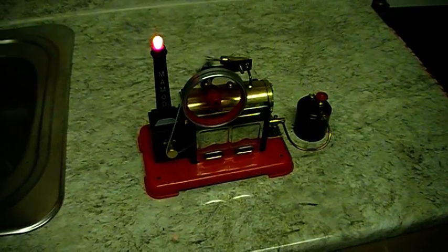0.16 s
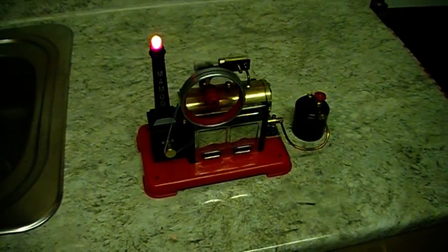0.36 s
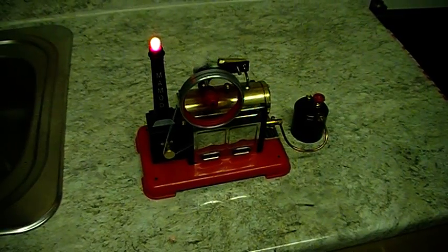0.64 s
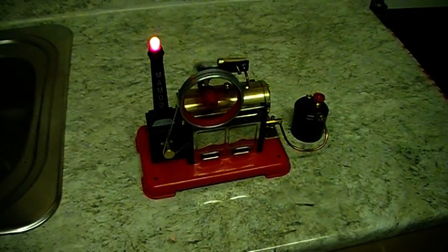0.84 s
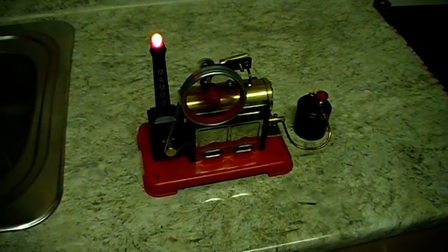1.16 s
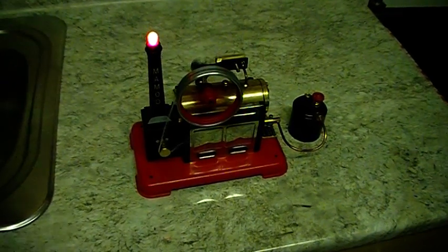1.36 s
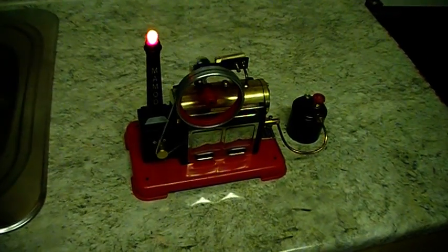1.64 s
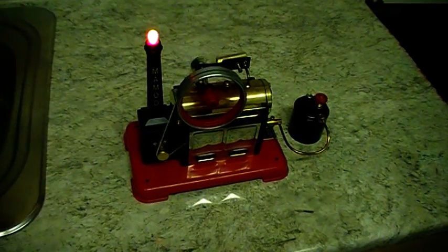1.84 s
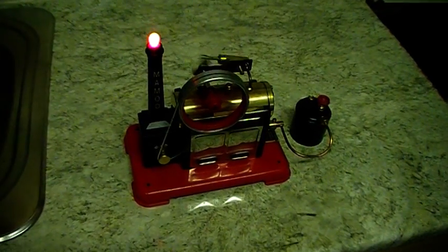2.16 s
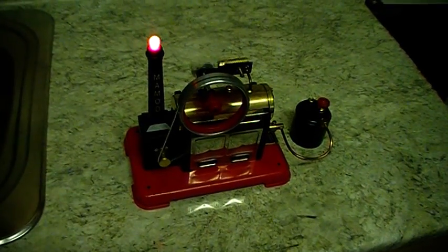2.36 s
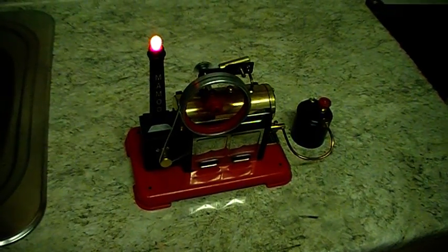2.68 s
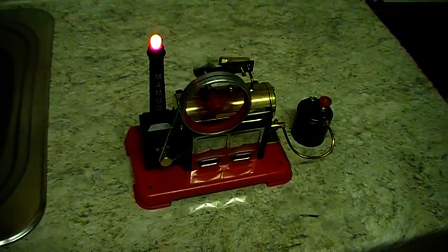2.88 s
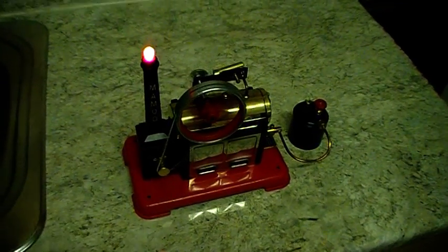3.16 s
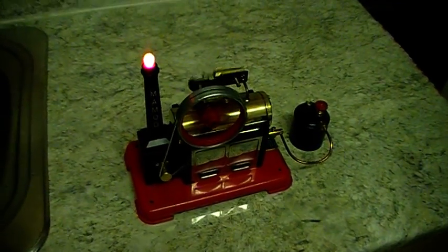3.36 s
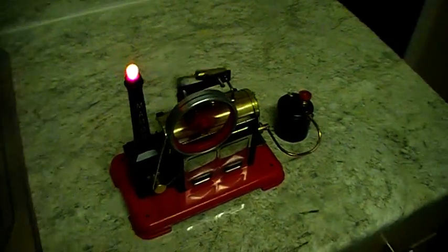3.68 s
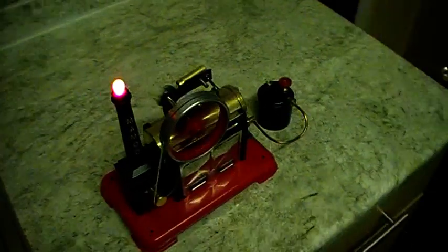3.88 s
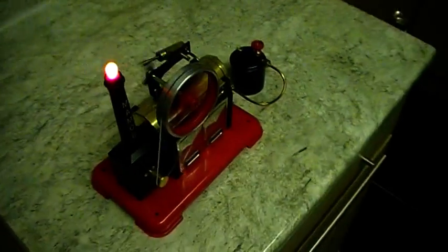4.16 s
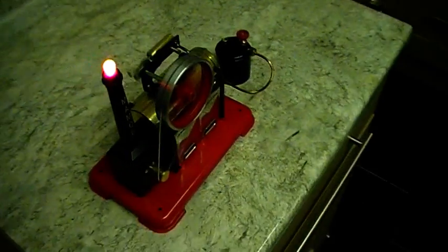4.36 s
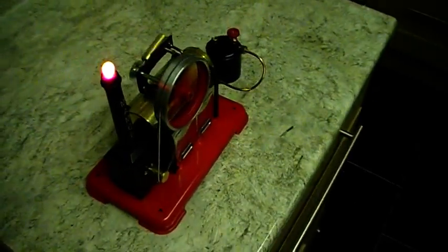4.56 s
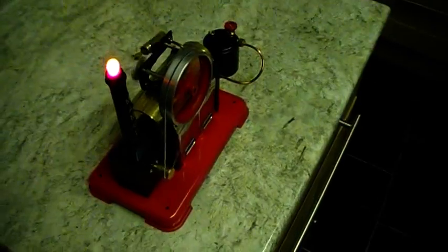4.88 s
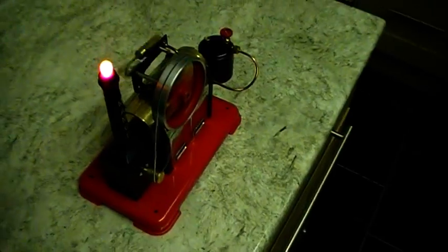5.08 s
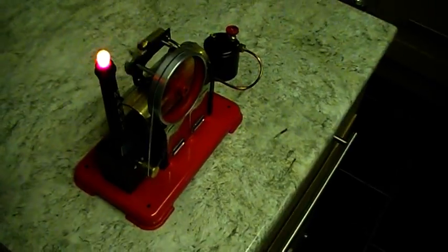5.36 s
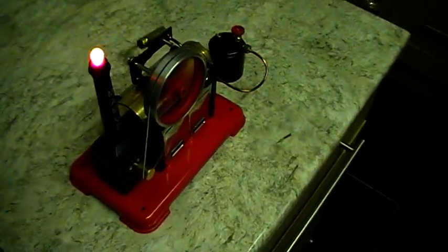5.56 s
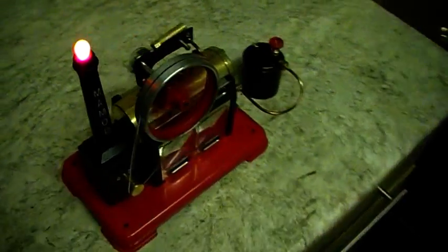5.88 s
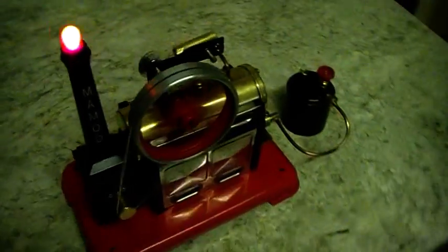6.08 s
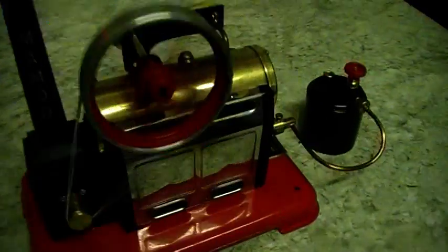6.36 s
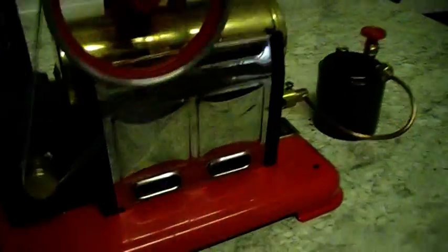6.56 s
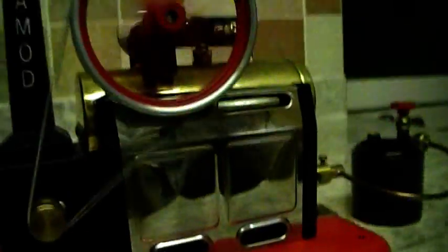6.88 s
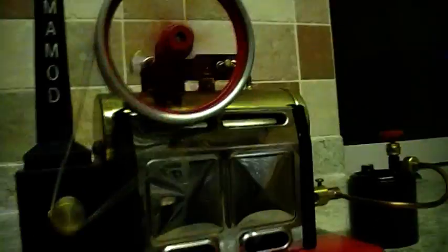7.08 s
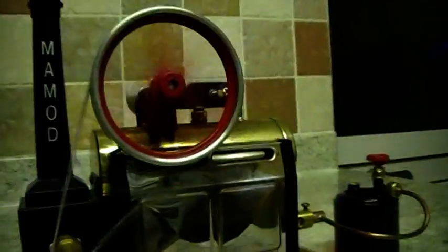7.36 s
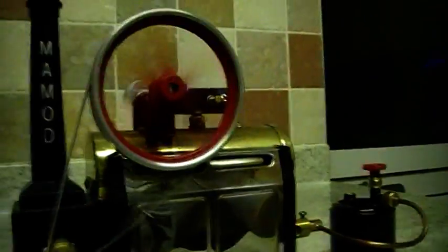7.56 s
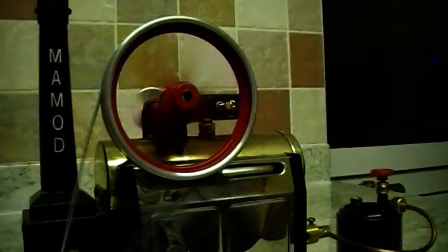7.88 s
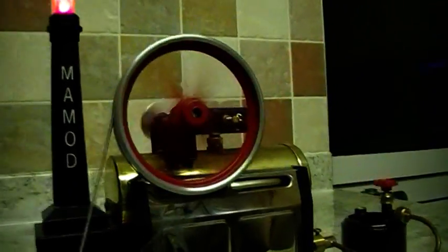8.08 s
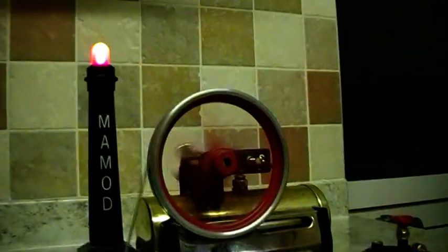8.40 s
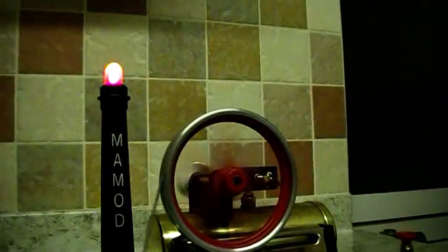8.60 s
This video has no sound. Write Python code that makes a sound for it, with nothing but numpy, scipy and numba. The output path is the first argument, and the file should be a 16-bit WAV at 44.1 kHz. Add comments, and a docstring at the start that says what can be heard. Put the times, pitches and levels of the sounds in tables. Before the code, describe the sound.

Fast, steady metallic clatter of a running miniature steam engine, with a buzzing dynamo and faint steam hiss, heard up close.

```python
"""Toy steam engine with dynamo.

The engine runs on a stone kitchen counter. Each crank turn gives a chuff and a string of knocks that
ring the tin base; a belt-driven dynamo chatters about five times as fast. The linkage rattles once per
belt lap and now and then clinks. Steam hisses throughout. The microphone moves from the front to the
side, then close to the flywheel."""
import sys
import numpy as np
from scipy import signal
from scipy.fft import rfft, irfft
from scipy.io import wavfile
from numba import njit

SR = 44100
rng = np.random.default_rng(int(sys.argv[2]) if len(sys.argv) > 2 else 0)


def wav_out(sig):
    """Save sig, one row per channel (or a flat mono array), as 16-bit PCM at SR to the path in sys.argv[1]."""
    wavfile.write(sys.argv[1], SR, np.round(np.clip(np.atleast_2d(sig).T, -1, 1) * 32767).astype(np.int16))


N = 384993
TIME_S = np.arange(N) / SR

CRANK_HZ, CRANK_START_S = 16.517, .0524
DYNAMO_HZ, DYNAMO_START_S = 85.008, .0009
BELT_HZ, BELT_START_S = 2.43, -.03
# (front, side, close)
CLATTER_DB, THUMP_DB = (-25.5, -21.5, -27), (-38.5, -35.5, -38)
CHUFF_DB, HOUSING_DB, LINK_DB = (-38, -36.5, -37), (-23.5, -31, -27), (-29, -31, -31)

# Crank and piston play, port leaks: (delay in turn [s], level [dB])
TURN_KNOCKS = [(.0026, -5), (.007, -3), (0.013, -3.5), (.02, -11.5), (.032, -3.5), (0.038, -4.5),
               (0.0478, -6)]
TURN_LEAKS = [(-.001, -11), (0.016, -1.5), (0.027, -3), (.039, -5.5)]
# Resonances: (centre [Hz], width [Hz], front [dB], side [dB], close [dB])
BODY_MODES = [(486.4, 43, 2, -12, -8), (513, 12, -4, -3, -9), (610.6, 16, -15.5, 0, -19),
              (904, 41, -1.5, -1.5, 9), (1103, 12, 12, 9.5, 16), (1143, 20, 15.5, -5, 17),
              (1243, 22, -5, 2.5, 13.5), (1385, 45, 5, 4, 3), (1454, 20, 11.5, 8.5, 11),
              (1502, 24, 9.5, 10, 9), (1695, 30, 5, 3, 9), (2280, 96, -4, -30, -14),
              (2490, 52, -14.5, -9, -25)]  # base, firebox, boiler
DYNAMO_HOUSING_MODES = [(888, 216, -7, 2, -2), (1171, 200, -10, -4, 0.5), (2060, 180, -6.5, -14, 6),
                        (3140, 90, -14, -24, -4.5), (3765, 58, -10.5, -17, -10)]
DYNAMO_PULLEY_MODES = [(5806, 195, -5, 0, -6.5), (6043, 410, 1, 2, 2.5)]
DYNAMO_SPINDLE_MODES = [(7810, 260, -7, 0, -0.5), (8230, 390, 2, 4.5, -4), (8740, 300, -9, -16, -3.5),
                        (9500, 320, -4.5, -14, -7.5), (10010, 230, -9, -1, -15),
                        (11930, 340, -12, -10, -17), (13200, 420, -16.5, -20, -28)]
# Linkage resonances: (centre [Hz], width [Hz], level [dB])
LINKAGE_MODES = [(1690, 98, 3.5), (2060, 60, 1.5), (2200, 500, -4.5), (2530, 95, -9)]
# Hard linkage strikes: (time [s], level [dB])
LINKAGE_STRIKES = [(0.0228, -10.5), (0.388, -12), (1.0894, -12), (1.4825, -14.5), (1.942, -10.5),
                   (2.3655, -8.5), (2.9048, -10.5), (3.247, -14.5), (3.3533, -11.5), (3.6, -10),
                   (3.9933, -17), (4.1756, -14), (6.5061, -10), (8.0945, -12)]
# Spectra: (frequency [Hz], level [dB])
PLATE_SPECTRUM = [(60, -57), (110, -18.5), (140, -6), (200, -24), (260, -17), (340, -12), (450, -14.5),
                  (680, -7), (830, 1), (980, 2), (1050, -11), (1140, -3), (1700, 0), (2400, 3.5),
                  (2900, -18), (3800, -2), (4400, -23.5), (15000, -37)]
THUMP_SPECTRUM = [(60, -38), (100, -5), (135, -26), (220, -9.5), (330, -15), (470, 9.5), (600, 10),
                  (900, -19.5), (2500, 2), (4000, -50.5)]
CHUFF_SPECTRUM = [(300, -30), (2000, 10), (3900, -9.5), (4700, 1.5), (5300, 4), (6200, -3), (7100, 1),
                  (9500, -1.5), (11500, -11.5), (15500, -44)]
PORT_SPECTRUM = [(1000, -37), (4500, -1), (7000, 4.5), (10000, 3.5), (13000, -4.5), (15500, -19)]
HISS_SPECTRUM = [(30, -51), (55, -43), (100, -15.5), (130, -12.5), (200, -13.5), (400, -4.5), (700, 5),
                 (1000, 11.5), (2400, 1.5), (3700, -1.5), (4300, -8), (5500, -4), (10000, -5.5),
                 (15500, -19.5)]
STEREO_ECHO_SPECTRUM = [(60, -15.5), (400, -16), (1300, -13.5), (4400, -11.5), (8000, -15), (10000, -1.5),
                        (15000, -12.5)]
# Running gear tones: (frequency [Hz], front [dB], side [dB], close [dB])
HUM_TONES = [(85, -64.5, -62.5, -63), (168, -62, -59.5, -64.5), (314, -53.5, -59.5, -60.5),
             (510.5, -66, -44.5, -47.5), (605, -48.5, -45.5, -48)]
# Microphone: (time [s], place [0 front, 1 side, 2 close], bounce lag [s], bounce [dB], L minus R [dB])
MIC_PATH = [(0, 0, .00205, -20, -1.2), (3.4, 0, .00205, -20, -.8), (4.3, 1, .002, -20, -.3),
            (5.8, 1, .00205, -17, -.1), (6.3, 1.3, .0024, -8, -.1), (6.8, 2, .0026, -15, 0),
            (8.73, 2, .0026, -20, -.3)]
# Microphone crossing the pulley's beam, passing the housing: (time [s], level [dB])
PULLEY_BEAM = [(0, -30.5), (1, -32.5), (3.2, -27), (3.7, -30), (4.4, -34.5), (5.3, -36), (6.3, -29),
               (6.53, -38), (6.75, -27.5), (7, -39.5), (7.3, -36.5), (7.55, -30.5), (8.3, -32),
               (8.65, -29.5)]
HOUSING_PROXIMITY = [(6, 0), (6.55, -2), (7.35, 2), (7.8, 1), (8.4, -2)]
# Gliding interference bands: (time [s], centre [Hz], gain [dB])
LOW_PEAK_GLIDE = [(5.9, 900, -0.5), (6.25, 830, 2.5), (6.5, 774, 3.5), (6.8, 700, 2)]
MID_PEAK_GLIDE = [(5.1, 1480, 0), (5.7, 1470, 2), (6.1, 1450, 4), (6.35, 1290, 3), (6.55, 1200, 0)]
MID_NOTCH_GLIDE = [(5.3, 2080, 0), (5.9, 2050, 0.5), (6.2, 1850, -4.5), (6.42, 1620, -4), (6.58, 1470, -2)]
TREBLE_NOTCH_GLIDE = [(6.35, 7700, 1), (6.6, 7960, -11), (7.15, 8500, -1), (8.73, 8200, -4)]
TREBLE_PEAK_GLIDE = [(6.2, 8280, -3), (6.48, 9000, 5), (6.72, 9900, 4), (6.9, 10000, 3.5)]


def knocks():
    """Loose bearings knock several times per crank turn."""
    return unit(sum(undb(db) * blows(CRANK_HZ, CRANK_START_S + delay_s, jitter_s=.0005, scatter_db=3.5)
                    for delay_s, db in TURN_KNOCKS))


def effort_db(build_db=2.5, build_s=2.8):
    """Level rises as steam pressure builds, with a slight waver."""
    return -build_db * np.maximum(1 - TIME_S / build_s, 0) + .1 * walk(2.5)


def clatter(hits, place):
    """Knocks, sheet-metal buzz and shaft rub ring the tin base, firebox and boiler."""
    buzz = bursts(hits, rise_s=.0011, decay_s=.0045)
    rub = rng.standard_normal(N)
    force = hits + undb(2) * (buzz + rub)
    modes = ring(force, BODY_MODES, place)
    plate = unit(colour(force + undb(-9.5) * convolve(force, tail(t60_s=.061)), PLATE_SPECTRUM))
    return undb(-.5) * modes + undb(-8.5) * plate


def thump():
    """The power stroke shoves the base against the counter."""
    stroke = blows(CRANK_HZ, CRANK_START_S + .001975, jitter_s=.000099, scatter_db=1.85)
    return unit(colour(stroke + undb(4.5) * convolve(stroke, tail(t60_s=.051)), THUMP_SPECTRUM))


def steam(place):
    """The exhaust chuffs once per turn, the ports spit, the boiler hisses."""
    puffs = blows(CRANK_HZ, CRANK_START_S - .001, jitter_s=.00023, scatter_db=1.24)
    exhaust = unit(colour(bursts(puffs, rise_s=.0026, decay_s=.0058), CHUFF_SPECTRUM))
    spits = sum(undb(db) * blows(CRANK_HZ, CRANK_START_S + delay_s, jitter_s=.0012, scatter_db=1.5)
                for delay_s, db in TURN_LEAKS)
    ports = unit(colour(bursts(spits, rise_s=.00072, decay_s=.0039), PORT_SPECTRUM))
    hiss = unit(colour(rng.standard_normal(N), HISS_SPECTRUM)) * undb(1.04 * walk(12))
    return undb(at_place(CHUFF_DB, place)) * (undb(6) * exhaust + undb(1.5) * ports) + undb(-29) * hiss


def dynamo(place):
    """The spindle knocks and scrapes once per turn, ringing itself, the pulley and the housing."""
    ticks = unit(blows(DYNAMO_HZ, DYNAMO_START_S, jitter_s=.0003, scatter_db=2))
    scrape = bursts(ticks, rise_s=.0011, decay_s=.0014)
    scrape += undb(-22.5) * rng.standard_normal(N)  # steady bearing rub
    chatter = scrape + undb(-17) * ticks
    pulley = undb(curves(PULLEY_BEAM)[0]) * ring(chatter, DYNAMO_PULLEY_MODES, place, order=2)
    spindle = undb(-32) * ring(chatter, DYNAMO_SPINDLE_MODES, place, order=2)
    housing_db = at_place(HOUSING_DB, place) + curves(HOUSING_PROXIMITY)[0]
    return pulley + spindle + undb(housing_db) * ring(ticks + scrape, DYNAMO_HOUSING_MODES, place)


def linkage(hits, place, spell_s=.091):
    """The belt joint shakes the linkage once per lap; it rattles for a few turns."""
    laps = (TIME_S - BELT_START_S) * BELT_HZ
    from_joint_s = (laps - np.round(laps)) / BELT_HZ
    looseness = np.exp(-.5 * (from_joint_s / spell_s) ** 2)
    level_db = at_place(LINK_DB, place) + .42 * walk(BELT_HZ)
    force = hits + undb(14) * bursts(hits, rise_s=.00033, decay_s=.0053)
    return looseness * undb(level_db) * ring(force, LINKAGE_MODES, place)


def clinks():
    """Hard linkage strikes, each a short, damped ring."""
    response = resonate(signal.unit_impulse(1024), hz=2090, width_hz=270)
    time_s, db = np.transpose(LINKAGE_STRIKES)
    strikes = np.bincount(np.round(time_s * SR).astype(int), undb(db - 1), N)
    return convolve(strikes, response / np.abs(response).max())


def sway():
    """The return stroke rocks the engine on its feet."""
    push = blows(CRANK_HZ, CRANK_START_S + .03355, jitter_s=.00037, scatter_db=3.5)
    return undb(-60.5) * unit(resonate(push, hz=138, width_hz=45))


def hum(place):
    """Low, wavering tones of the spinning parts."""
    tones = 0
    for hz, *levels_db in HUM_TONES:
        gain = np.sqrt(2) * undb(at_place(levels_db, place) + walk(2.8))
        tones += gain * np.sin(2 * np.pi * hz * TIME_S + .22 * walk(3.5))
    return tones


def counter_bounce(x, lag_s, cutoff_hz=2500):
    """Dull reflection off the counter; its lag follows the microphone."""
    dull = signal.sosfilt(signal.butter(1, cutoff_hz, fs=SR, output="sos"), x)
    return np.interp(np.arange(N) - lag_s * SR, np.arange(N), dull)


def phasing(x):
    """Gliding peaks and notches: direct and reflected sound interfere as the microphone closes in."""
    for glide, width_hz in [(LOW_PEAK_GLIDE, 170.), (MID_PEAK_GLIDE, 170.), (MID_NOTCH_GLIDE, 630.),
                            (TREBLE_NOTCH_GLIDE, 510.), (TREBLE_PEAK_GLIDE, 800.)]:
        hz, db = curves(glide)
        x = x + (undb(db) - 1) * bandpass(x, hz, width_hz)
    return x


def blows(rate_hz, start_s, jitter_s, scatter_db):
    """One impulse per turn, uneven in time and strength."""
    turns = np.arange(-1, int(N / SR * rate_hz) + 1)
    timing, strength = rng.standard_normal((len(turns), 2)).T
    at = np.round((start_s + turns / rate_hz + jitter_s * timing) * SR).astype(int)
    inside = (at >= 0) & (at < N)
    return np.bincount(at[inside], undb(scatter_db * strength[inside]), N)


def bursts(impulses, rise_s, decay_s):
    """Noise burst after each impulse."""
    t = TIME_S[:4096]
    envelope = (1 - np.exp(-t / rise_s)) * np.exp(-t / decay_s)
    return unit(convolve(impulses, envelope) * rng.standard_normal(N))


def ring(x, modes, place, order=1):
    """Resonances weighted by place; pairs alternate in sign. Order 2: flat-topped mode clusters."""
    total = 0
    for k, (hz, width_hz, *levels_db) in enumerate(modes):
        sos = signal.butter(order, [hz - width_hz / 2, hz + width_hz / 2], "band", fs=SR, output="sos")
        total += (-1) ** (k // 2) * at_place(undb(levels_db), place) * signal.sosfilt(sos, x)
    return unit(total)


def resonate(x, hz, width_hz):
    """Two equal resonators in series."""
    b, a = signal.iirpeak(hz, hz / width_hz, fs=SR)
    return signal.lfilter(b, a, signal.lfilter(b, a, x))


@njit
def bandpass(x, hz, width_hz):
    """State-variable band-pass, unity gain at its moving centre."""
    y, band_state, low_state = np.empty(len(x)), 0., 0.
    for i in range(len(x)):
        g, damping = np.tan(np.pi * hz[i] / SR), width_hz / hz[i]
        band = (band_state + g * (x[i] - low_state)) / (1 + g * (g + damping))
        band_state = 2 * band - band_state
        low_state += 2 * g * band
        y[i] = damping * band
    return y


def colour(x, spectrum, size=4096):
    """Minimum-phase filter with the given spectrum."""
    hz, db = np.transpose(spectrum)
    bins_hz = np.maximum(np.fft.rfftfreq(size, 1 / SR), 1)
    gain = undb(np.interp(np.log(bins_hz), np.log(hz), db))
    cepstrum = irfft(np.log(gain))
    cepstrum[1:size // 2] *= 2
    cepstrum[size // 2 + 1:] = 0
    return convolve(x, irfft(np.exp(rfft(cepstrum))))


def tail(t60_s, size=16384):
    """Dense modes or echoes: decaying noise, energy 1."""
    response = rng.standard_normal(size) * np.exp(-np.log(1000) * TIME_S[:size] / t60_s)
    return response / np.linalg.norm(response)


def walk(rate_hz):
    """Slow random drift, spread near 1."""
    steps = rng.standard_normal(int(N / SR * rate_hz) + 2)
    return np.sqrt(3 / 2) * np.interp(TIME_S * rate_hz, np.arange(len(steps)), steps)


def curves(table):
    """Columns of a timed table, per sample."""
    time_s, *columns = np.transpose(table)
    return [np.interp(TIME_S, time_s, column) for column in columns]


def at_place(levels, place):
    """Blend (front, side, close) levels."""
    return np.interp(place, np.arange(len(levels)), levels)


def convolve(x, response):
    return signal.oaconvolve(x, response)[:N]


def undb(db):
    return 10 ** (np.asarray(db) / 20)


def unit(x):
    """Scale to rms 1."""
    return x / np.sqrt(np.mean(x ** 2))


def scene():
    """Engine, dynamo and short kitchen echo, in stereo."""
    place, lag_s, bounce_db, pan_db = curves(MIC_PATH)
    dip_db = -5 * np.exp(-.5 * ((TIME_S - 6.47) / .13) ** 2)  # base dips as the microphone swoops in
    hits = knocks()
    base = undb(at_place(CLATTER_DB, place) + effort_db() + dip_db) * clatter(hits, place)
    base += undb(at_place(THUMP_DB, place) + dip_db) * thump()
    direct = base + linkage(hits, place) + clinks() + sway() + steam(place) + dynamo(place)
    near = phasing(direct + undb(bounce_db) * counter_bounce(direct, lag_s))
    mid = near + undb(-10.5) * convolve(near, tail(t60_s=.28)) + hum(place)
    # each channel catches its own echoes, mostly treble
    side = colour(convolve(mid, tail(t60_s=.31)), STEREO_ECHO_SPECTRUM)
    return undb(.5) * np.array([(mid + side) * undb(pan_db / 2), (mid - side) * undb(-pan_db / 2)])


def record(dry):
    """Steep low-pass at 15750 Hz."""
    return signal.sosfilt(signal.ellip(12, .1, 80, 15750, fs=SR, output="sos"), dry)


dry = scene()
out = record(dry)
wav_out(out)
```